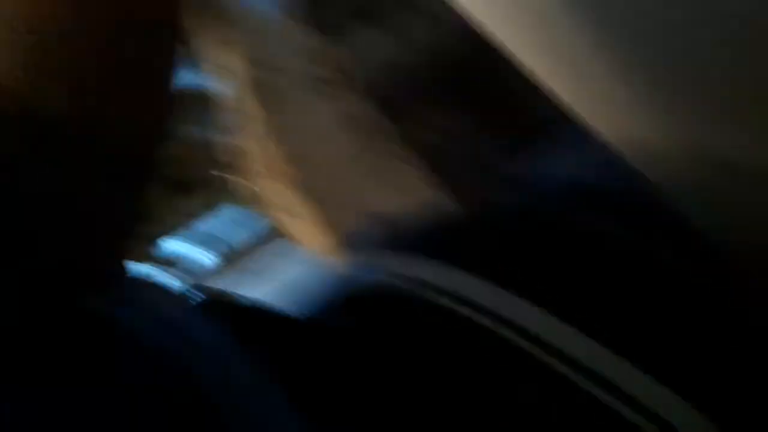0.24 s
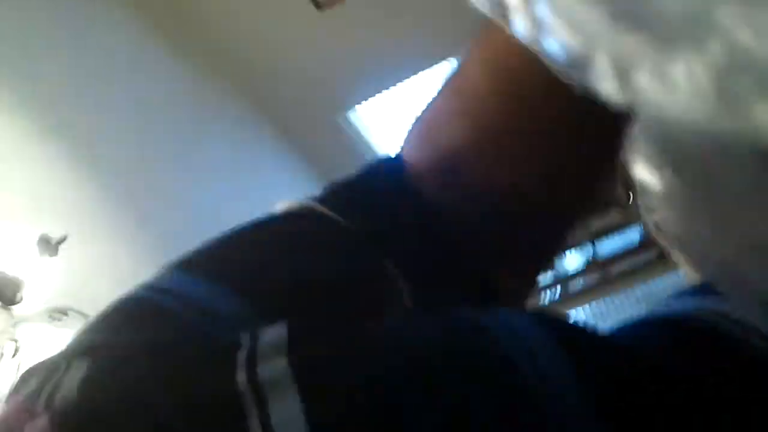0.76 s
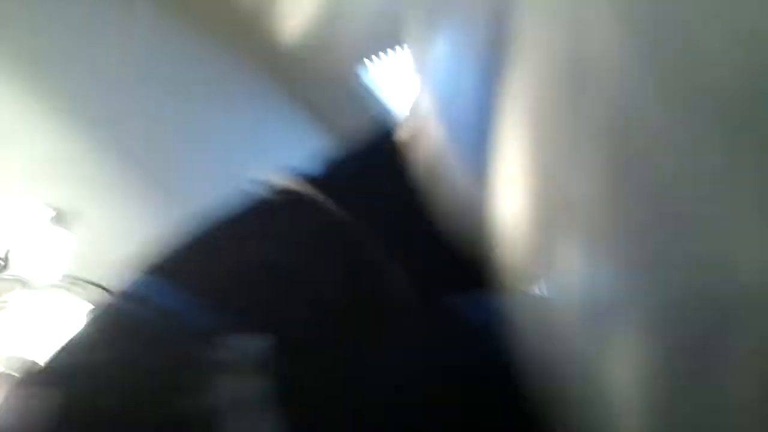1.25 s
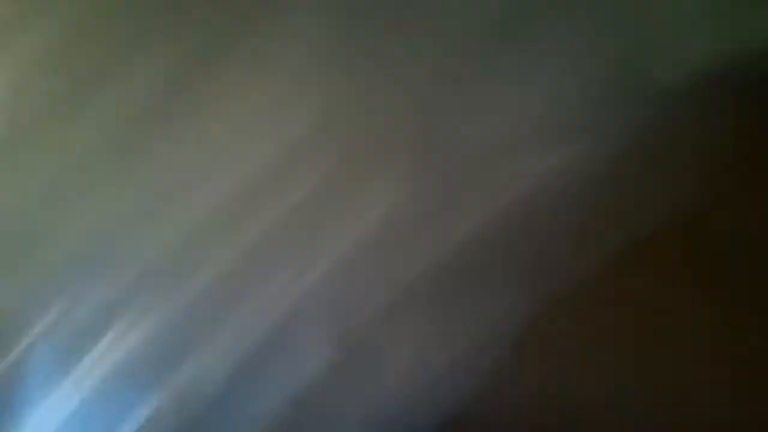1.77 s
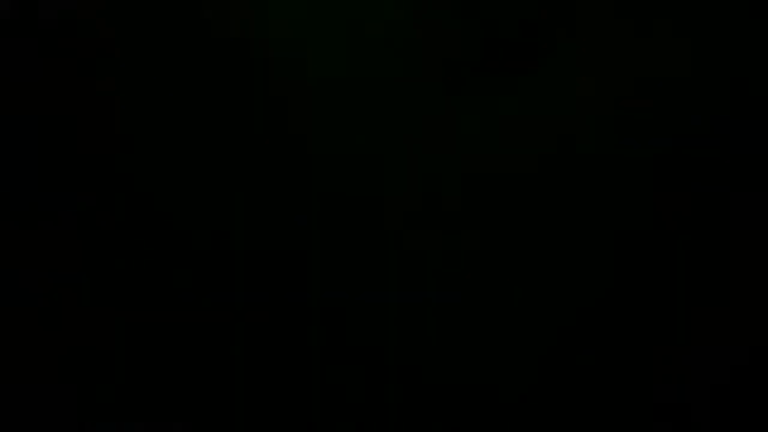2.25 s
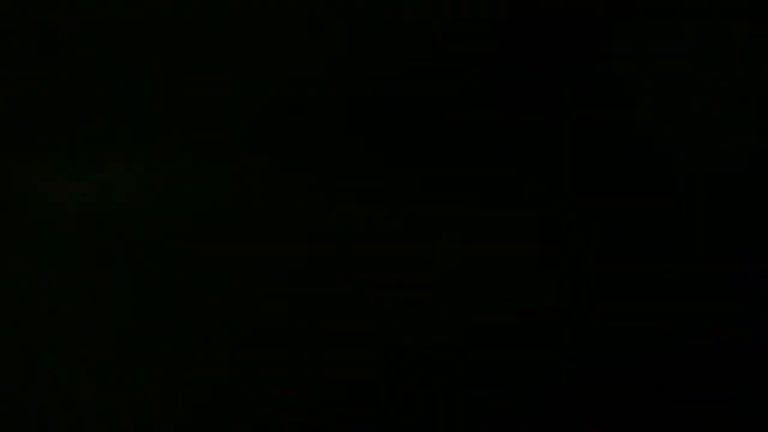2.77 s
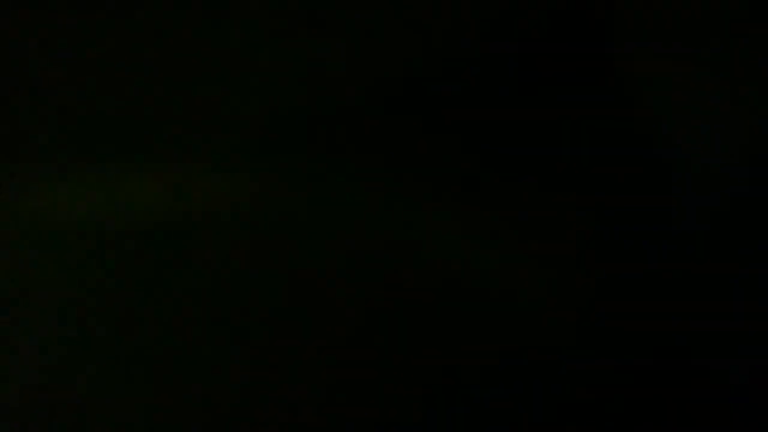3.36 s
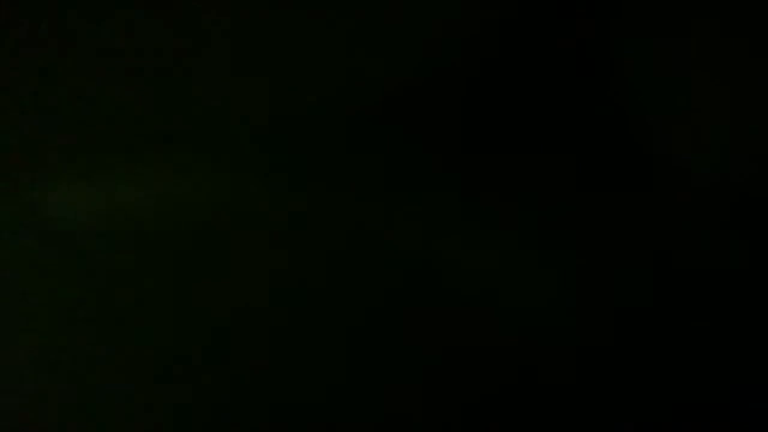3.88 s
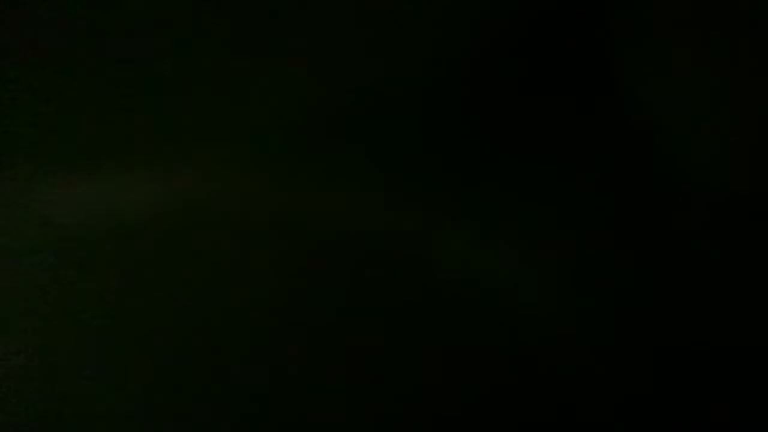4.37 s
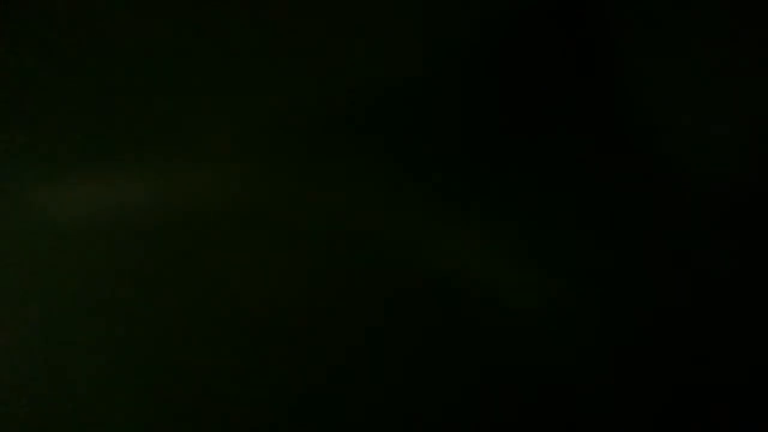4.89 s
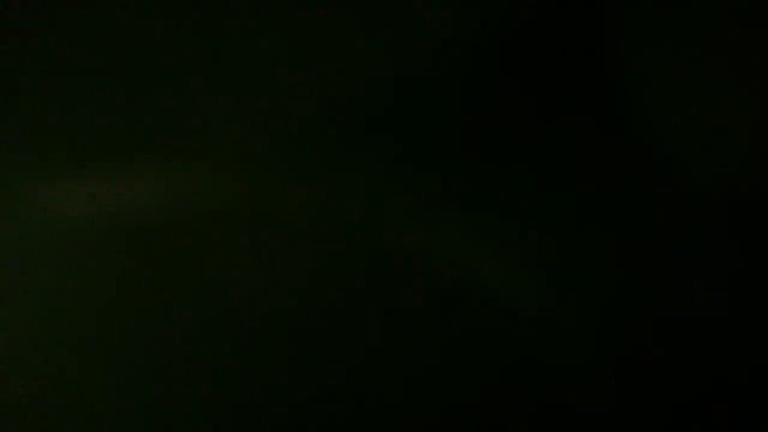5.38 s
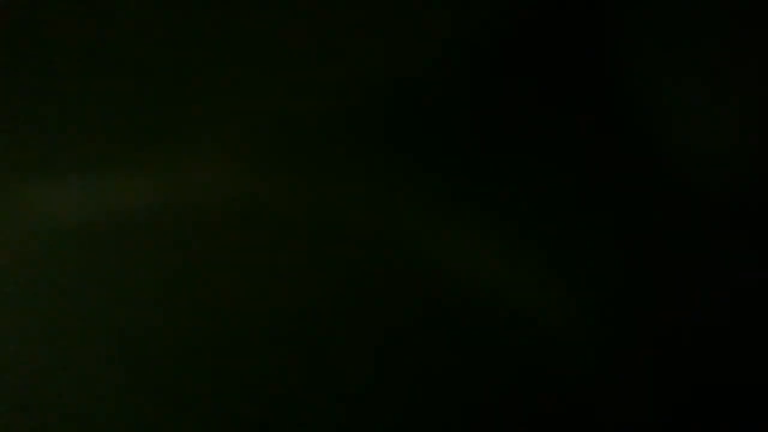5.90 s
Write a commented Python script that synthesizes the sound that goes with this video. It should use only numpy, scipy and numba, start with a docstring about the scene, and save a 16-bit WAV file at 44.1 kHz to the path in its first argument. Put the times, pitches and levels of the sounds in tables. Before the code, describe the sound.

Hands dig through foam packing peanuts and plastic wrap in a cardboard box, very close to a phone microphone. Light rustling starts at once and swells into loud, bright crinkling with sharp cracks from about 0.3 to 1.7 seconds. Soft knocks bump the phone near 0.8 and 1.1 seconds, with a stronger thump at 1.6. After a short lull, quieter, fuller rustling runs from 2.1 to 2.7 seconds. A dense volley of cracks follows around 2.9 to 3.3 seconds, ending in a dull knock. The packing shifts softly, then crackles again from 4.1 to 4.6 seconds and briefly at 5.1. Light rustling continues, rising into one more crinkle around 6 seconds. A faint steady hiss lies underneath, with a barely audible low hum near 4 seconds. The loudest cracks distort slightly.

```python
"""Digging through foam peanuts

Hands dig through foam peanuts and plastic wrap in a cardboard box, right beside a small phone.
Thousands of tiny creases snap in clumps, an air pocket rings near 4 kHz and bigger folds crack in
volleys. The phone gets bumped, and a faint hum passes over a bed of hiss. The phone samples
narrowly, leaks a faint mirror band and clips the loudest cracks."""
import sys
import numpy as np
from scipy import signal
from scipy.fft import rfft, irfft
from scipy.io import wavfile
from scipy.ndimage import uniform_filter1d, map_coordinates
from numba import njit

SR = 44100
rng = np.random.default_rng(int(sys.argv[2]) if len(sys.argv) > 2 else 0)


def wrap_up_sound(samples):
    """Save the sound to the file named by the first command line argument, as 16-bit audio."""
    columns = np.atleast_2d(samples).T
    # keep every value between -1 and 1, then stretch to whole-number steps
    tamed = np.clip(columns, -1, 1)
    steps = np.round(tamed * 32767).astype(np.int16)
    wavfile.write(sys.argv[1], SR, steps)


N = 270774


def undb(db):
    return 10 ** (np.asarray(db) / 20)


def level(x, db):
    return x * undb(db) / np.sqrt(np.mean(x ** 2))


def curves(table, s):
    """Read each automation lane of a time table at the given moments."""
    at, *columns = np.transpose(table)
    return [np.interp(s, at, c) for c in columns]


def colour(table, hz):
    """Gain in dB of an EQ curve at the given pitches."""
    at, db = np.transpose(table)
    return np.interp(np.log(hz), np.log(at), db)


def wander(rate):
    """Slewed sample-and-hold noise: rate steps a second, spread near 1."""
    hold = int(SR / rate)
    steps = np.repeat(rng.standard_normal(N // hold + 1), hold)
    return 1.2 * uniform_filter1d(steps, hold)[:N]


@njit
def ring(start, hz, cycles, size):
    """Mix damped sine grains, each dying at a rate of 60 dB in the given number of cycles."""
    out = np.zeros(N)
    for k in range(len(start)):
        decay = np.log(1000) * hz[k] / (SR * cycles)
        pole = np.exp(-decay + 2j * np.pi * hz[k] / SR)
        phasor = size[k] + 0j
        for i in range(start[k], min(N, start[k] + int(5.8 / decay))):  # tail ends 50 dB down
            out[i] += phasor.imag
            phasor *= pole
    return out


# EQ of a crease's snap: (frequency [Hz], gain [dB])
CREASE_EQ = [(60, -39.5), (130, -27.5), (300, -5), (1000, -1.5), (2500, 0.5), (4900, -2.5), (6500, 1),
             (7600, 0.5)]
# Brightness of the wrap around the phone: (time [s], gain at 6.6 kHz [dB])
WRAP_BRIGHTNESS = [(0.0, -6.5), (1.0, -6), (1.25, -2), (1.6, 4), (2.05, 0), (2.3, 6), (2.6, 4.5),
                   (2.9, 0.5), (3.2, 1), (3.45, 4), (4.3, 2.5), (5.1, -1), (5.4, 2)]


def snaps(s, db, bass_db, bass_hz, lift_db, chance, cycles, spread_db):
    """Creases snap as short pings scattered over seven octaves, now and then a big one."""
    pitch_draw, size_draw, sign_draw = chance[:, :3].T
    hz = 60 * (7600 / 60) ** (pitch_draw ** .6)
    low_shelf = bass_db / (1 + (hz / bass_hz) ** 2)
    top_bell = curves(WRAP_BRIGHTNESS, s)[0] * np.exp(-(np.log(hz / 6600) / .25) ** 2)
    tone_db = colour(CREASE_EQ, hz) + low_shelf + top_bell + lift_db(hz)
    accent_db = -spread_db * np.log(size_draw)
    # for the same power per Hz, short high grains need more size and crowded pitches less
    crowding = pitch_draw ** (1 / .6 - 1) + .01
    size = hz / 3000 / np.sqrt(crowding) * undb(db + tone_db + accent_db)
    start = np.clip(s * SR, 0, N - 1).astype(np.int64)
    return ring(start, hz, cycles, size * np.sign(sign_draw - .5))


def crease_pops(per_s=130, decay_ms=.87, top_db=10):
    """Lone creases pop above the bed: a gain lane in dB whose spikes die within milliseconds."""
    when, strength = rng.random((int(per_s * N / SR), 2)).T
    spikes = np.zeros(N)
    spikes[(when * N).astype(int)] = undb(2 * top_db * np.sqrt(strength))
    extra_power = signal.lfilter([1], [1, -np.exp(-1000 / (decay_ms * SR))], spikes)
    return 10 * np.log10(1 + extra_power)


def bead_clicks(per_s=70, size_db=16, spread_db=2.5):
    """Single beads of foam let go with a bare click, a few much louder than the rest."""
    when, sign, size = rng.random((int(per_s * N / SR), 3)).T
    out = np.zeros(N)
    out[(when * N).astype(int)] = np.sign(sign - .5) * undb(size_db - spread_db * np.log(size))
    return out


# Grabs of the hand: (start [s], level [dB], attack [s], time to fade 20 dB [s], bass shelf [dB])
GRABS = [(0, -24, .002, .15, -9), (.05, -27, .045, .04, -11), (.184, -29, .003, .2, -13),
         (.19, -22, .06, 0.25, -13.5), (.28, -15.5, 0.04, .6, -10), (.45, -10.5, .11, .045, -6),
         (0.601, -10.5, .068, 0.146, -8), (.79, -22, .085, .09, -10), (.91, -27.5, .025, .4, -14),
         (.98, -7.5, 0.096, 0.1968, -6), (1.17, -19, .07, .4, -1.5), (1.27, -19, .05, .13, -4),
         (1.37, -7, .19, .1, 7), (2.13, -24.5, .04, 0.36, -4.5), (2.24, -19, .075, .33, 5),
         (2.32, -21.5, .07, .22, 10), (2.49, -24, .05, .2, 12), (2.58, -30, .07, .03, 8),
         (2.73, -27, .08, .6, -10), (2.9, -20.5, .1, 0.43, -12.5), (3.09, -14, .025, 0.2051, -2),
         (3.21, -18, 0.08, 0.13, 2.5), (3.43, -28.5, 0.028, 0.25, 2.5), (3.53, -30, .075, .09, 2),
         (3.675, -28, .04, .12, 2), (3.72, -26, .045, .035, 7), (4.036, -27.5, 0.017, 0.55, -8.5),
         (4.06, -15.5, 0.22, .22, 3), (4.48, -18.5, 0.067, 0.1458, -13.5), (4.59, -21, 0.035, .09, -11.5),
         (4.97, -27, 0.064, .5, -3.5), (5.1, -13, .068, 0.19, -9.5), (5.32, -26, 0.048, .3, 7),
         (5.545, -29, .04, .6, -5), (5.66, -30, .06, .4, -5), (5.8, -26, .012, .9, -10),
         (5.87, -23, .11, .3, -10), (6.03, -17.5, .11, .1, -8)]


def hands(settle_db=-39, settle_fade_s=.7, settle_bass_db=6):
    """Each grab swells, fades and leaves the peanuts settling; gives the rustle's gain and bass lanes."""
    start, db, attack, fade, bass_db = np.transpose(GRABS)[:, :, None]
    s = np.arange(0, N / SR + .002, .002)
    rise = np.clip((s - start) / attack, 0, 1) ** 1.18
    since_peak = np.maximum(s - start - attack, 0)
    grab = (rise * undb(db - 20 * since_peak / fade)) ** 2
    tail_db = settle_db + .2 * db  # a harder grab leaves a slightly louder tail
    settle = (rise * undb(tail_db - 20 * since_peak / settle_fade_s)) ** 2
    power = (grab + settle).sum(axis=0) + 1e-12
    bass = (grab * bass_db + settle * settle_bass_db).sum(axis=0) / power
    return [np.interp(np.arange(N) / SR, s, lane) for lane in (np.sqrt(power), bass)]


def rustle(count=70000):
    """Tiny creases snap in clumps under the hands; patches of like-sized creases come and go."""
    chance = rng.random((count, 4))
    at = (chance[:, 3] * N).astype(int)
    clumps_db = .63 * wander(90) + crease_pops()
    patches = np.array([wander(22)[at] for _ in range(10)])  # one gain lane every 850 Hz

    def patch_db(hz):
        return 2.72 * map_coordinates(patches, [hz / 850, np.arange(count)], order=1, mode="nearest")

    gain, bass_db = hands()
    creases = snaps(at / SR, clumps_db[at], bass_db[at], bass_hz=650, lift_db=patch_db,
                    chance=chance, cycles=14, spread_db=1.5)
    return (level(creases, 0) + bead_clicks()) * gain


# Air pocket in the wrap, until it is pressed flat: (time [s], boost [dB], pitch [Hz])
AIR_POCKET = [(0.0, 16, 3950), (.4, 10, 3680), (1.0, 12, 3750), (1.25, 6, 3800), (1.55, 11, 3850),
              (1.9, 10, 4050), (2.1, 10, 3600), (2.2, 18, 3800), (2.3, 11, 4250), (2.38, 3, 3600),
              (2.54, 11, 4200), (2.67, 0, 4000)]


def air_pocket(x, width_hz=665):
    """Trapped air boosts its own band of the rustle; the pitch moves as the pocket is squeezed."""
    db, hz = curves(AIR_POCKET, np.arange(N) / SR)
    carrier = np.exp(2j * np.pi * np.cumsum(hz) / SR)
    # swept band-pass: shift down to 0 Hz, low-pass, shift back
    lowpass = signal.butter(1, width_hz / 2, fs=SR, output="sos")
    band = 2 * (signal.sosfilt(lowpass, x / carrier) * carrier).real
    return x + (undb(db) - 1) * band


# EQ of the room tone: (frequency [Hz], gain [dB])
ROOM_EQ = [(50, -17), (120, 4), (1400, 1), (7600, -5.5)]


def room_tone(db=-53):
    """A steady bed of faint hiss."""
    hz = np.maximum(np.arange(N // 2 + 1) * SR / N, 1)
    spectrum = rfft(rng.standard_normal(N)) * undb(colour(ROOM_EQ, hz))
    return level(irfft(spectrum, N), db)


# Folds that crack: (time [s], relative level [dB], relative bass [dB], length [ms], body pitch [Hz])
FOLDS = [(0.08, -17, -20, 3, 4000), (0.2898, -6, -25, 2.3, 3550), (0.2952, -7, -15, 8, 3550),
         (0.306, -5, -9.5, 22, 3550), (0.3645, -8, -27, 2.46, 3480), (0.5262, -11, -5.5, 7.0, 3740),
         (0.6309, -9, -4, 4.4, 3590), (0.6813, -9.5, -9.5, 18.5, 3900), (0.7017, -5, -26, 1.5, 3500),
         (0.7645, -9, -19, 9, 3580), (0.814, -11, -28, 1.8, 4230), (0.8414, -12, 5, 3.9, 3400),
         (0.8508, -9, -19, 18, 3760), (0.8805, -11, -25, 2, 3700), (0.931, -14.5, -30, 3.1, 3650),
         (0.944, -20, -25, 2, 3800), (0.951, -21, -25, 2, 2500), (0.9709, -15, -33, 2.2, 3500),
         (1.01, -7.5, -12.5, 8.9, 3800), (1.0765, -12, 9.5, 7.5, 2060), (1.1639, -9, -34, 5.04, 4400),
         (1.3178, -9, -20, 2.5, 3700), (1.3445, -11, -15, 2.5, 3600), (1.3936, -14, -6, 1.75, 3620),
         (1.4354, -7, -17, 3.1, 3800), (1.458, -6, -16, 1.6, 3550), (1.6555, -16, 0, 7, 3760),
         (2.1863, -25, -19, 21.5, 3980), (2.42, -20, -4, 4.6, 6250), (2.5305, -22, 7, 2.86, 415),
         (2.9243, -13, -15, 8, 1980), (2.932, -8.5, -13.5, 25, 2200), (2.9645, -8, -25, 2, 6300),
         (2.969, -9, -20, 16, 1000), (2.9945, -10, -17.0, 4.5, 3140), (3.0224, -19, -27, 4.0, 6300),
         (3.0291, -4.5, -21.5, 22.6, 870), (3.0756, -4, -11, 4.8, 1020), (3.0824, -5.5, -18, 3.5, 2050),
         (3.0957, -8, -15, 1.5, 6300), (3.1005, -7, -6, 6, 980), (3.1192, -4.5, -20, 4.2, 2610),
         (3.1307, -12, -10, 12, 6300), (3.1486, -8, -9, 4, 1080), (3.1666, -10.5, 5, 4.8, 6250),
         (3.1818, -15.5, -5, 2.4, 970), (3.2629, -20, 8, 2.2, 400), (3.3078, -9, -5, 4, 308),
         (3.7596, -26.5, 1, 11.8, 990), (4.1688, -22, -9, 9.2, 6350), (4.2278, -17, 10, 5.4, 300),
         (4.248, -10, 5, 4, 2550), (4.2547, -14, 10, 10, 1330), (4.2665, -10, -5, 8, 2800),
         (4.418, -9, -6, 2.5, 367), (4.4751, -9.5, -9, 10.8, 382), (4.4956, -22, -23, 10, 6350),
         (4.509, -13, -22, 11.6, 1250), (4.523, -12, -33, 5.4, 2960), (4.543, -9, -34, 2.44, 4500),
         (4.5658, -11.5, -30, 5.8, 3740), (4.5754, -8, -54, 9.6, 2650), (5.1032, -26, -8, 3.5, 2680),
         (5.1441, -11, -8, 5, 900), (5.1535, -18.5, -2, 7.2, 2080), (5.3696, -27.5, 7, 23, 1740),
         (5.71, -18, -13, 2.6, 1210), (5.8078, -27, -4, 15.4, 1100), (5.9951, -16, -26, 2.7, 2680),
         (6.0341, -20.5, 4, 2.9, 2440), (6.107, -13, -1, 10.5, 391), (6.1188, -13, -4, 5.45, 1710)]


def fold_cracks(count=120):
    """A fold gives way in a volley of creases that weakens towards its end and favours the fold's pitch."""
    s, db, bass_db, ms, body_hz = (np.repeat(column, count) for column in np.transpose(FOLDS))
    chance = rng.random((len(s), 4))
    progress = chance[:, 3]
    onset_s = s + .9 * progress * ms / 1000
    # a longer volley spreads the same number of creases, so each is bigger
    crease_db = db + 10 * np.log10(ms / count) + 9 - 5.5 * progress

    def body_db(hz):
        return 10.5 * np.exp(-(np.log(hz / body_hz) / .18) ** 2)

    return snaps(onset_s, crease_db, bass_db + 5.5, bass_hz=1080, lift_db=body_db,
                 chance=chance, cycles=16.4, spread_db=.93)


# Bumps against the phone: (time [s], level [dB], pitch [Hz])
BUMPS = [(0.841, -19, 102), (1.08, -21.5, 150), (1.563, -11.5, 141), (1.66, -31, 80), (2.31, -33, 200),
         (2.53, -27, 150), (3.311, -13, 310), (3.755, -29, 140)]


def bumps(cycles=7):
    """Soft knocks reach the microphone through the phone's shell."""
    s, db, hz = np.transpose(BUMPS)
    return ring((s * SR).astype(np.int64), hz, cycles, undb(db))


def hum(hz=118, db=-63, start_s=3.83, end_s=4.25, fade_s=.04):
    """A faint low sine fades in and out again."""
    s = np.arange(N) / SR
    gate = np.clip(np.minimum(s - start_s, end_s - s) / fade_s, 0, 1)
    return np.sqrt(2) * undb(db) * gate * np.sin(2 * np.pi * hz * s)


def scene():
    """Mono mix of the crackling packing, bumps, room tone and hum."""
    packing = air_pocket(rustle()) + fold_cracks()
    # thin film and foam radiate hardly any deep bass
    low_cut = signal.butter(3, 150, "high", fs=SR, output="sos")
    return (signal.sosfilt(low_cut, packing) + bumps() + room_tone() + hum())[None]


def record(dry, sampling_hz=16000, mirror_db=-25, ceiling=.72, knee=14):
    """The phone's input saturates, narrow sampling mirrors the top band faintly, and overshoots clip."""
    saturated = .69 * np.tanh(dry / .84)
    narrow = signal.sosfilt(signal.ellip(8, .5, 70, 7230, fs=SR, output="sos"), saturated)
    narrow = signal.sosfilt(signal.butter(1, 60, "high", fs=SR, output="sos"), narrow)
    mirror = saturated * np.cos(2 * np.pi * sampling_hz * np.arange(N) / SR)
    mirror = signal.sosfilt(signal.butter(4, [8450, 9000], "band", fs=SR, output="sos"), mirror)
    mix = narrow + undb(mirror_db) * mirror
    clipped = mix / (1 + np.abs(mix / ceiling) ** knee) ** (1 / knee)
    high_cut = signal.ellip(8, .1, 45, 15850, fs=SR, output="sos")
    return signal.sosfiltfilt(high_cut, clipped)


dry = scene()
out = record(dry)
wrap_up_sound(out)
```